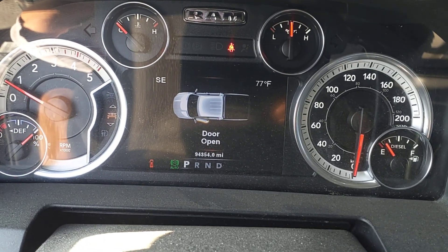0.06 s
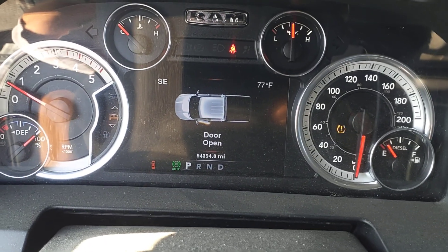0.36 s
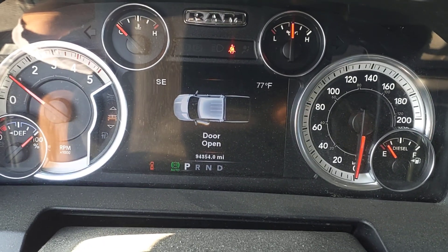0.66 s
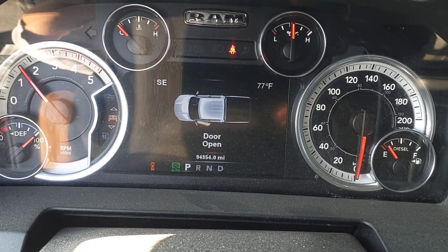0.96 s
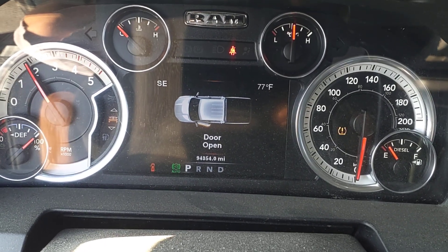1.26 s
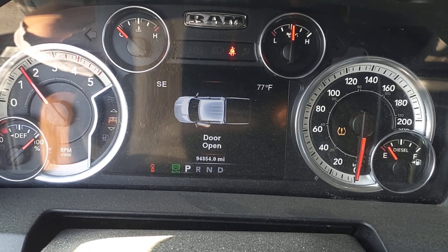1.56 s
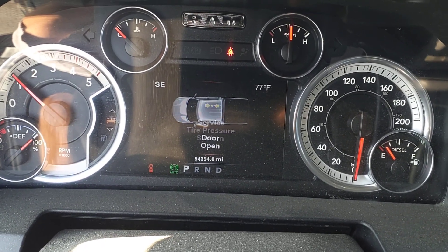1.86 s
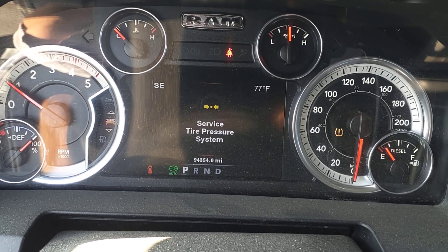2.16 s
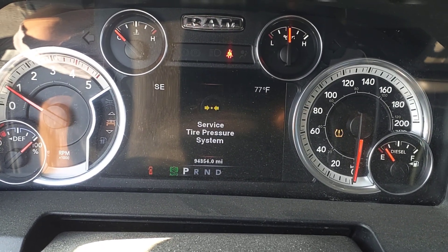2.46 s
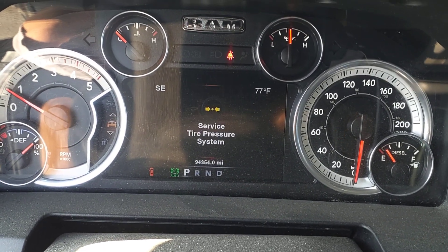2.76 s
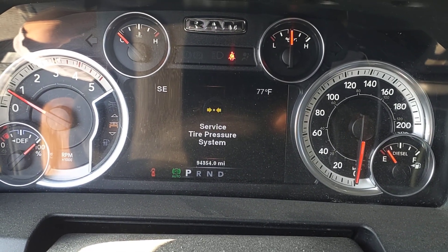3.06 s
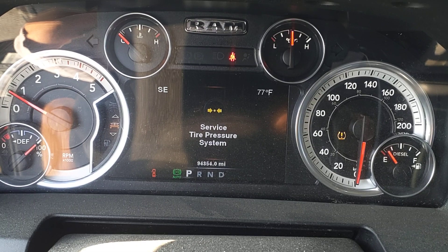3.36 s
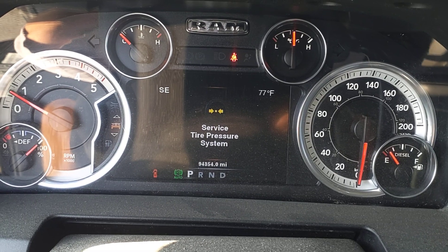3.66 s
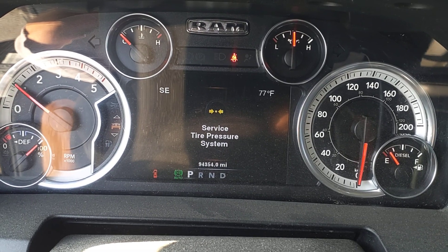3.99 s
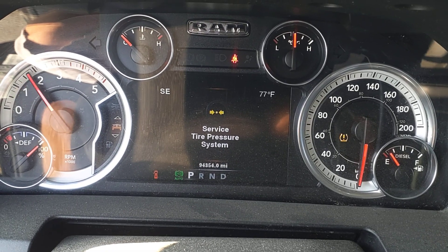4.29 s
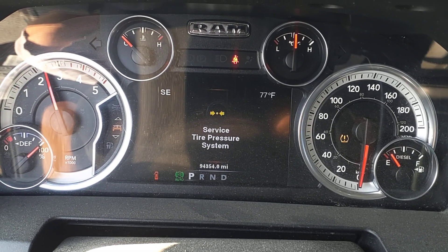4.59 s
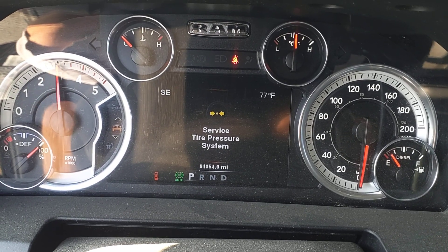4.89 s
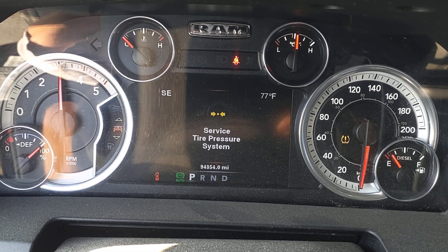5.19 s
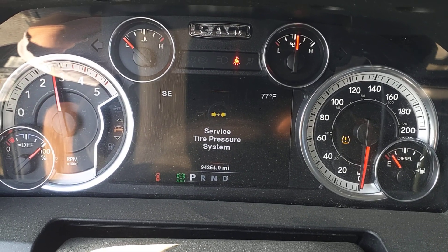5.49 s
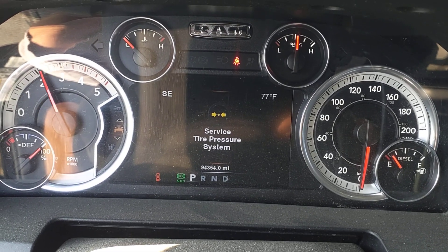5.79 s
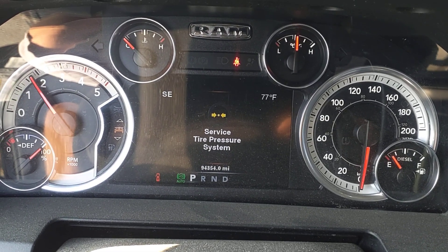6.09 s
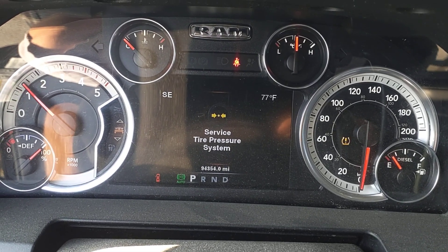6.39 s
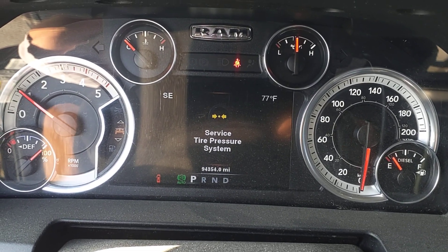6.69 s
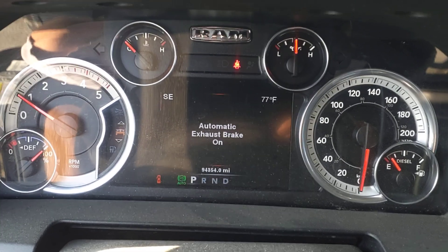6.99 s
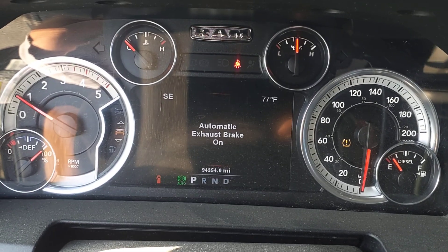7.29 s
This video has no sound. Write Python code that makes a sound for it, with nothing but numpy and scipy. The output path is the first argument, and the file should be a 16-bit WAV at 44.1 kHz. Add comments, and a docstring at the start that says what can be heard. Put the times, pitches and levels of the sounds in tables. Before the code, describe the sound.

A diesel pickup engine idles, revs up twice with booming bass and clatter, and settles again, heard from inside the cab.

```python
"""A six-cylinder diesel pickup from the driver's seat. It starts on a loping idle, its cylinders
unequal. A blip of the pedal at 0.3 s makes the firing pulses boom in the cab, while combustion roar,
injector rattle and intake hiss swell through the bulkhead. It idles again, then from 3.7 s revs to
the governor, where the timing gears whine through a ringing panel. After 5.1 s it sinks back with a
shudder, and a last blip begins at 7.3 s. A gain control ducks the whole sound after each boom."""
import sys
import numpy as np
from scipy import signal
from scipy.fft import rfft, irfft, next_fast_len
from scipy.io import wavfile
from scipy.ndimage import uniform_filter1d

SR = 44100
rng = np.random.default_rng(int(sys.argv[2]) if len(sys.argv) > 2 else 0)


def waveform_to_disk(signal):
    """Save audio, clipped to [-1, 1], as 16-bit WAV at the path in sys.argv[1]."""
    frames = np.transpose(np.atleast_2d(signal))
    scaled = np.clip(frames, -1, 1) * 32767
    samples = np.round(scaled).astype(np.int16)
    wavfile.write(sys.argv[1], SR, samples)


N = 328545
TIME = np.arange(N) / SR
FFT_SIZE = next_fast_len(N)
IDLE_HZ, GOVERNED_HZ = 35, 156.5   # firings per second
PANEL_HZ, PANEL_WIDTH_HZ = 749.2, 12   # a bulkhead panel that rings


def from_db(db):
    """Decibels to gain."""
    return 10 ** (np.asarray(db) / 20)


def unit_rms(x):
    """Scale to unit power."""
    return x / np.sqrt(np.mean(x ** 2) + 1e-20)


def evened(x):
    """Hold the slow level at 1 and keep the throb."""
    window = SR // 6
    return x / np.sqrt(uniform_filter1d(uniform_filter1d(x ** 2, window), window // 2) + 1e-12)


def curve_at(points, hz):
    """Read a curve over log frequency."""
    point_hz, values = np.transpose(points)
    return np.interp(np.log(hz), np.log(point_hz), values)


def drift(rate_hz):
    """A smooth random wander of spread 1 that turns about rate_hz times a second."""
    step, run_in = 40, 2000
    pole = np.exp(-2 * np.pi * step * rate_hz / SR)
    noise = rng.standard_normal(N // step + run_in + 2)
    slow = signal.lfilter([1], [1, -2 * pole, pole * pole], noise)[run_in:]
    return np.interp(np.arange(N) / step, np.arange(len(slow)), unit_rms(slow))


def resonance(x, hz, width_hz):
    """Two-pole resonance with gain 1 at its peak."""
    r = np.exp(-np.pi * width_hz / SR)
    poles = [1, -2 * r * np.cos(2 * np.pi * hz / SR), r * r]
    return signal.lfilter(np.array([1, 0, -1]) * (1 - r * r) / 2, poles, x)


def lagged(x, seconds):
    """Follow x with a one-pole lag."""
    pole = np.exp(-1 / (seconds * SR))
    return signal.lfilter([1 - pole], [1, -pole], x)


def swells(rows, width_s):
    """A bell-shaped bump around each event."""
    return sum(height * np.exp(-((TIME - at_s) / width_s) ** 2) for at_s, height in rows)


# The rev curve. Each row: time in seconds, firings per second.
REV_CURVE = [(0, 35), (.28, 35.2), (.6, 75.5), (1.0, 99.8), (1.11, 102), (1.3, 82.5), (1.75, 48),
             (2.0, 37.2), (2.8, 35.8), (3.65, 35.3), (3.84, 69.5), (4.09, 91.5), (4.2, 105.6),
             (4.66, 155.7), (5.07, 156.5), (5.25, 143.3), (5.5, 116), (5.92, 78.6), (6.3, 50), (6.56, 40.1),
             (7.27, 33), (7.45, 62)]

def crankshaft():
    """Engine cycles completed (two turns of the crank each), and speed as a share of governed speed."""
    firing_hz = np.interp(TIME, *np.transpose(REV_CURVE))
    return np.cumsum(firing_hz) / SR / len(CYLINDER_STRENGTHS), firing_hz / GOVERNED_HZ


# Fuel from the pedal or idle governor. Each row: start in seconds, end in seconds, load from 0 to 1.
FUEL_SPELLS = [(.3, .39, .03), (.39, .54, .25), (.54, .73, .65), (.73, .92, 1), (.92, 1.09, .6),
               (1.98, 3.66, .33), (3.66, 4.63, .85), (4.63, 5.08, .12), (6.51, 7.28, .22), (7.28, 7.6, .7)]

def engine_load():
    """The engine takes up each spell of fuel with a short lag and coasts in between."""
    fuel = sum(load * ((TIME >= start) & (TIME < end)) for start, end, load in FUEL_SPELLS)
    return lagged(fuel + 1e-9, seconds=0.022)


def fader(speed, load, idle_db, rev_db, curve, load_db):
    """A layer's gain: idle_db, plus rev_db by full speed and load_db by full load."""
    revs = np.maximum((speed * GOVERNED_HZ - IDLE_HZ) / (GOVERNED_HZ - IDLE_HZ), 1e-6)
    return from_db(idle_db + rev_db * revs ** curve + load_db * load)


def each_cycle(harmonics, cycles):
    """A wave that repeats with every engine cycle."""
    size = 8192
    wave = unit_rms(irfft(harmonics, size))
    return np.interp(cycles % 1 * size, np.arange(size), wave, period=size)


# How hard each cylinder hits, in firing order.
CYLINDER_STRENGTHS = [1.5, 1.15, .9, .55, 1.15, .75]

def knock(cycles, depth):
    """An envelope that jumps at every firing and decays, each cylinder by its own amount."""
    firings = cycles * len(CYLINDER_STRENGTHS)
    strength = np.array(CYLINDER_STRENGTHS)[firings.astype(int) % len(CYLINDER_STRENGTHS)]
    return unit_rms(1 + depth * strength * np.exp(-2 * (firings % 1)))


def clatter(cycles, speed, locked, depth):
    """Combustion noise, plus valve and gear contacts at fixed crank angles that take over with speed."""
    patterns = np.exp(2j * np.pi * rng.random((2, 500))) * (np.arange(500) > 0)
    contacts = np.array([each_cycle(pattern, cycles + .0011 * drift(10)) for pattern in patterns])
    combustion = rng.standard_normal((2, N)) * knock(cycles, depth)
    share = locked * speed ** 2
    return (share * contacts + combustion) / np.sqrt(1 + share ** 2)


# The cab's stereo image. Each row: frequency in Hz, left-right likeness from 0 to 1.
EAR_LIKENESS = [(120, .99), (250, .92), (400, .72), (550, .65), (760, .8), (1100, .55), (1600, .55),
                (2300, .3), (4000, .2), (7000, .15)]
# Each row: frequency in Hz, left minus right in dB.
EAR_BALANCE = [(200, -3.5), (330, -3.5), (510, 2), (790, -1), (1210, 3), (1870, 0), (2870, .5), (4410, 4.5),
               (6770, 4), (8500, 4), (12000, -2.5)]
# Each row: frequency in Hz, phase lead of the left ear in radians.
EAR_PHASE = [(60, -.1), (300, -.45), (520, -.1), (780, -.3), (1100, -1.5), (1640, -3.1), (2930, -6.3),
             (4480, -10.2), (6500, -13.5)]

def in_cab(pair, eq):
    """EQ two unrelated signals and spread them at unit level: alike in the bass, wide in the treble."""
    hz = np.maximum(np.arange(FFT_SIZE // 2 + 1) * SR / FFT_SIZE, 1)
    mid, side = rfft(pair, FFT_SIZE) * from_db(curve_at(eq, hz))
    alike = curve_at(EAR_LIKENESS, hz)
    signs = np.array([[1], [-1]])
    ears = np.sqrt(1 + alike) * mid + signs * np.sqrt(1 - alike) * side
    ears *= from_db(signs * curve_at(EAR_BALANCE, hz) / 2)
    ears *= np.exp(.5j * signs * curve_at(EAR_PHASE, hz))
    stereo = irfft(ears, FFT_SIZE)[:, :N]
    return stereo / np.std(stereo.mean(axis=0))


# Engine bay whistles. Each row: start and end in seconds, pitch in Hz, width in Hz, level in dB.
BAY_WHISTLES = [(-.3, 0.548, 3350, 52, -61), (3.677, 3.71, 4930, 200, -47), (6.682, 7.2, 366, 4.3, -39.5),
                (6.71, 7.256, 738, 22, -44)]

def whistles():
    """Faint, narrow bands of noise swell and fade."""
    out = np.zeros(N)
    for start, end, hz, width, db in BAY_WHISTLES:
        swell = np.sin(np.pi * np.clip((TIME - start) / (end - start), 0, 1))
        band = resonance(resonance(rng.standard_normal(N), hz, width), hz, width)
        out += from_db(db) * swell * evened(band)
    return out


# EQ of the intake hiss and of the airy top above it. Each row: frequency in Hz, relative level in dB.
HISS_EQ = [(2400, -34.5), (4000, -7.5), (4890, -2.5), (5450, -2.5), (6180, -7.5), (6700, -12), (7200, -20),
           (7700, -29.5), (8600, -26.5), (10000, -58)]
AIR_EQ = [(6500, -25), (7600, 1.5), (8600, 1), (10500, -2.5), (12000, -2.5), (13800, 0.5), (16000, 1)]
# The turbo's gulps. Each row: time in seconds, lift of the airy top in dB.
TURBO_GULPS = [(.55, 11), (3.86, 4.5), (7.45, 8.5)]

def intake(cycles, speed, load):
    """Turbulent air pulses with the engine and surges as the turbo gulps after each stab of the pedal."""
    gulp_db = swells(TURBO_GULPS, width_s=0.22)
    hiss = in_cab(rng.standard_normal((2, N)) * knock(cycles, depth=.23), HISS_EQ)
    hiss *= fader(speed, load, idle_db=-49, rev_db=16, curve=.78, load_db=3.5)
    air = in_cab(rng.standard_normal((2, N)) * knock(cycles, depth=.2), AIR_EQ)
    air *= fader(speed, load, idle_db=-73, rev_db=28, curve=.72, load_db=6)
    return from_db(.33 * gulp_db) * hiss + from_db(gulp_db) * air


# EQ of the floor pan. Each row: frequency in Hz, relative level in dB.
FLOOR_EQ = [(190, -30.5), (240, -4), (270, -8.5), (310, -2.5), (360, -1), (440, -10.5), (520, -6.5),
            (640, -57.5)]

def floor_drone(cycles, speed, load):
    """The floor pan hums with the block; as the revs rise, passing harmonics light up its mode."""
    drive = clatter(cycles, speed, locked=1.1, depth=.57)
    ring = from_db(2) * speed * resonance(drive, hz=298, width_hz=36)
    gain = fader(speed, load, idle_db=-42.5, rev_db=11.5, curve=.9, load_db=4.5)
    return gain * in_cab(drive + ring, FLOOR_EQ)


# EQ of the injectors. Each row: frequency in Hz, relative level in dB.
INJECTOR_EQ = [(880, -20.5), (1500, 1), (1630, -0.5), (1980, -5.5), (2460, -8), (3590, -11.5), (4400, -20),
               (5720, -48.5), (9680, -120)]

def injector_rattle(cycles, speed, load):
    """The injectors put a bright clatter on every firing."""
    gain = fader(speed, load, idle_db=-45.5, rev_db=12.5, curve=1.06, load_db=1.5)
    return gain * in_cab(clatter(cycles, speed, locked=.54, depth=.29), INJECTOR_EQ)


# EQ of the engine block. Each row: frequency in Hz, relative level in dB.
BLOCK_EQ = [(400, -7), (520, -9), (590, 0), (650, -2.5), (740, 2), (810, -1.5), (1080, -1.5), (1180, -3),
            (1520, -8), (1700, -20.5), (2200, -63)]

def combustion_roar(cycles, speed, load):
    """The midrange clatter of the block, coloured by the ringing panel."""
    drive = clatter(cycles, speed, locked=1.4, depth=.61)
    ring = from_db(-2) * resonance(drive, PANEL_HZ, PANEL_WIDTH_HZ)
    gain = fader(speed, load, idle_db=-36, rev_db=9.5, curve=1.8, load_db=2.5)
    return gain * in_cab(drive + ring, BLOCK_EQ)


# Level rides on the diesel knock. Each row: time in seconds, lift or dip in dB.
KNOCK_RIDES = [(.15, -0.7), (2.85, 2), (7.12, 0.5)]

def knock_hardness():
    """A gain that makes the knock a little harder or softer now and then at idle."""
    return from_db(swells(KNOCK_RIDES, width_s=0.27))


# Gear and accessory tones. Each row: multiple of the engine cycle, dB at full speed before the panel.
GEAR_TONES = [(21, -41.5), (22, -37), (26, -45), (29, -31.5), (34, -36.5), (38, -45.5), (48, -38.5),
              (52, -39.5), (54, -50.5), (57, -39), (58, -42.5), (96, -50), (114, -55), (120, -47.5)]

def gear_whine(cycles, speed):
    """Meshing tones rise steeply near full speed and sing out when they meet the panel."""
    angle = cycles + .0005 * drift(13)   # play between the teeth smears the higher tones most
    tones = sum(from_db(db + 1.5 * drift(5.1)) * np.sin(2 * np.pi * k * angle) for k, db in GEAR_TONES)
    tones = np.sqrt(2) * tones * speed ** 20
    return tones + from_db(6) * resonance(tones, PANEL_HZ, PANEL_WIDTH_HZ)


def rocking(cycles, at_s=5.36, level_db=-19, waver_db=3):
    """Once the pedal is let go, the engine rocks: an unsteady throb at half the firing rate."""
    envelope = swells([(at_s, from_db(level_db))], width_s=0.27) * from_db(waver_db * drift(7.6))
    return np.sqrt(2) * envelope * np.sin(np.pi * len(CYLINDER_STRENGTHS) * cycles)


# Air modes of the cab. Each row: frequency in Hz, width in Hz, relative level in dB.
CAB_AIR_MODES = [(72.4, 17, -11.5), (101.4, 22.4, 2), (144.6, 17.6, 3), (180.4, 35.3, -1), (203.7, 25, -17)]

def lope(cycles, speed, load):
    """Unequal cylinders fill in lines between the firing tones; the exhaust thumps ring the cab's air."""
    k = np.arange(64)   # harmonics of the engine cycle
    slot = k % len(CYLINDER_STRENGTHS)
    harmonics = np.fft.fft(CYLINDER_STRENGTHS)[slot]
    harmonics[[0, 1, 6, 9, 12]] = 0   # 6, 9 and 12 belong to the boom
    angle = cycles + .0035 * drift(15)
    uneven = each_cycle(harmonics * (slot != 0), angle)
    firings = each_cycle(harmonics * (slot == 0) / (k + 1) ** 2, angle)
    # single firings stand apart at idle and run together as the speed rises
    thumps = evened(uneven + .06 / speed ** 2 * firings) * (1 + .18 * drift(40))
    drives = np.array([thumps, rng.standard_normal(N)])
    rung = sum((-1) ** i * from_db(db) * resonance(drives, hz, width)
               for i, (hz, width, db) in enumerate(CAB_AIR_MODES))
    throb, rumble = signal.sosfilt(signal.butter(3, [55, 250], "band", fs=SR, output="sos"), rung)
    gain = fader(speed, load, idle_db=-24, rev_db=2, curve=1.2, load_db=5.5)
    return gain * evened(evened(throb) + .36 * unit_rms(rumble))


# Drive of the tones at 1, 1.5 and 2 times the firing rate. Each row: pumping in dB at idle speed, its
# dB per octave of speed, full-load combustion in dB at idle speed, its dB per octave, load exponent.
BOOM_DRIVES = [(-7, 4, 20, -5.5, 0.75), (-13.5, 6, -11, 8.5, .6), (-11.5, 4.5, 9.5, -5.5, 0.51)]
# How the cab carries a low tone. Each row: frequency in Hz, gain in dB.
CAB_BASS_EQ = [(35, -65.5), (48, -44), (60, -26.5), (71, -21.5), (80, -19.5), (89, -12), (102, -15.5),
               (120, -20), (145, -19.5), (180, -19.5), (235, -32), (295, -26.5), (315, -47)]

def boom(cycles, speed, load, waver_db=2.24):
    """Piston pumping and combustion drive three low tones that boom as they sweep the cab's peaks."""
    firing_hz = speed * GOVERNED_HZ
    octaves = np.log2(firing_hz / IDLE_HZ)
    phase = 2 * np.pi * len(CYLINDER_STRENGTHS) * cycles
    out = np.zeros(N)
    for k, (pump_db, pump_slope, burn_db, burn_slope, exponent) in zip((1, 1.5, 2), BOOM_DRIVES):
        pumping = from_db(pump_db + pump_slope * octaves)
        burning = from_db(burn_db + burn_slope * octaves) * load ** exponent
        cab_gain = from_db(curve_at(CAB_BASS_EQ, k * firing_hz) + waver_db * drift(12.2))
        out += np.sqrt(2) * np.hypot(pumping, burning) * cab_gain * np.sin(k * phase)
    return out


# The exhaust shudders on pick-up and after a rev. Each row: time in seconds, lift of the lope in dB.
EXHAUST_SHUDDERS = [(.38, 1), (1.32, 5), (5.42, 7)]

def low_end(cycles, speed, load):
    """Boom, lope and rocking fill the cab and reach the right ear a little earlier and louder."""
    shudder_db = swells(EXHAUST_SHUDDERS, width_s=0.17)
    bass = from_db(.47 * shudder_db) * boom(cycles, speed, load)
    bass += from_db(shudder_db) * lope(cycles, speed, load)
    bass += rocking(cycles)
    delayed = np.interp(TIME - .00032, TIME, bass)
    return np.array([from_db(-.7) * delayed, from_db(.7) * bass])


def scene():
    """One crankshaft drives the engine layers; speed and load ride their levels."""
    cycles, speed = crankshaft()
    load, hardness = engine_load(), knock_hardness()
    body = low_end(cycles, speed, load) + floor_drone(cycles, speed, load)
    mids = hardness * combustion_roar(cycles, speed, load) + gear_whine(cycles, speed)
    top = hardness * injector_rattle(cycles, speed, load) + intake(cycles, speed, load)
    return body + mids + top + whistles()


def gain_control(x, threshold_db=-15, squeeze=0.67, attack_s=0.052, recovery_db_per_s=3):
    """Each boom pushes the whole sound down; it creeps back over the next seconds."""
    level_db = 10 * np.log10(uniform_filter1d(np.mean(x ** 2, axis=0), SR // 10) + 1e-12)
    wanted_cut_db = squeeze * np.maximum(level_db - threshold_db, 0)
    recovered_db = recovery_db_per_s * TIME
    cut_db = np.maximum.accumulate(wanted_cut_db + recovered_db) - recovered_db
    return x * from_db(-lagged(cut_db, attack_s))


def record(dry):
    """Gain control rides the level, the loudest swings are rounded and the top is cut steeply."""
    ceiling, cutoff_hz = .92, 15800
    held = gain_control(dry)
    rounded = held / (1 + (held / ceiling) ** 8) ** (1 / 8)
    return signal.sosfilt(signal.ellip(12, .1, 90, cutoff_hz, fs=SR, output="sos"), rounded)


dry = scene()
out = record(dry)
waveform_to_disk(out)
```